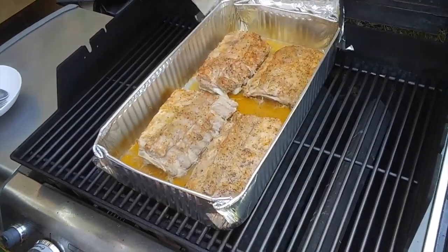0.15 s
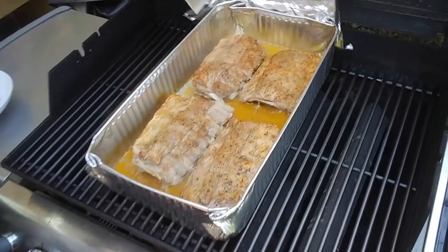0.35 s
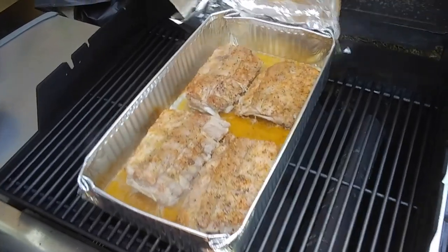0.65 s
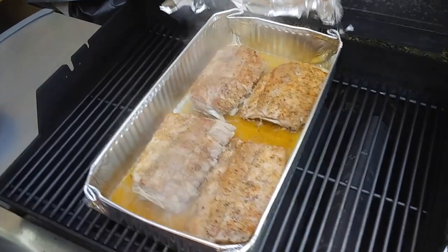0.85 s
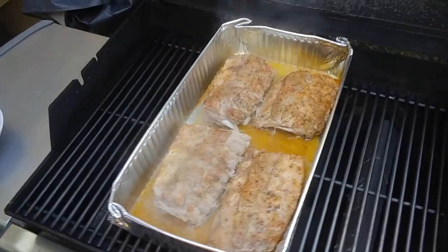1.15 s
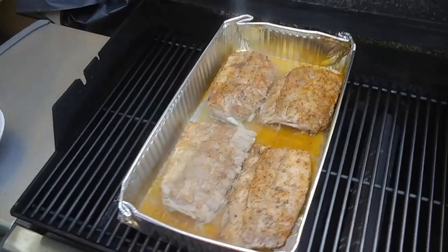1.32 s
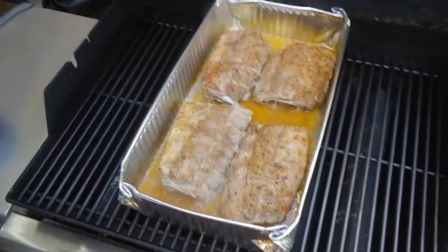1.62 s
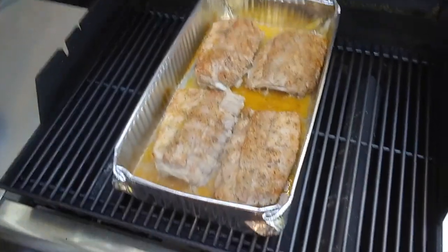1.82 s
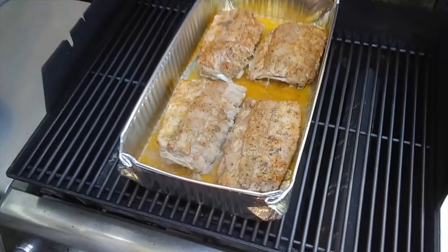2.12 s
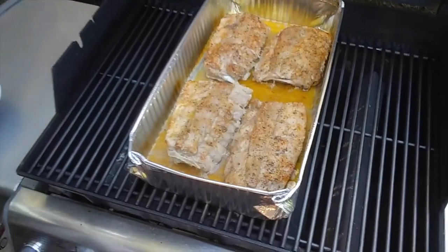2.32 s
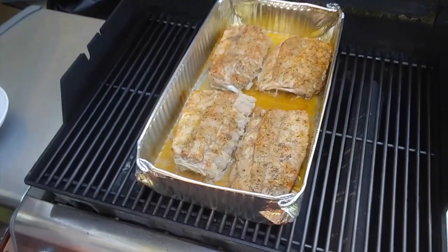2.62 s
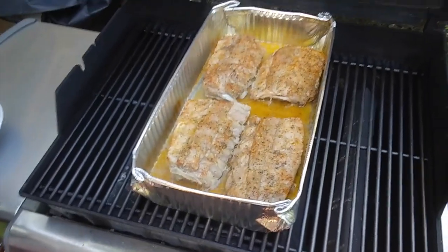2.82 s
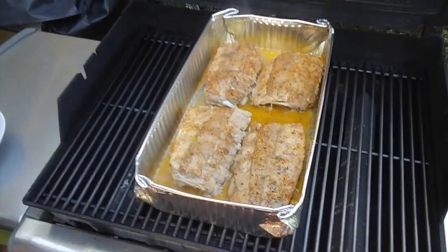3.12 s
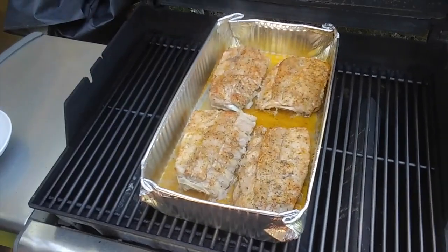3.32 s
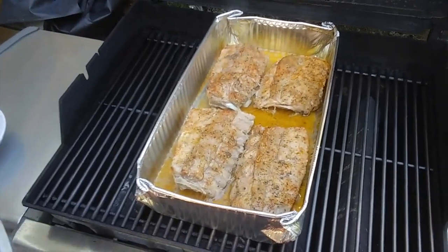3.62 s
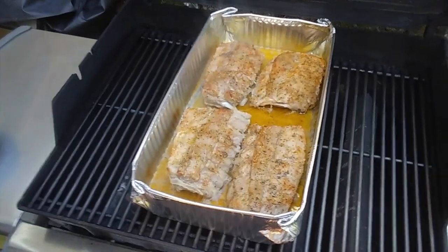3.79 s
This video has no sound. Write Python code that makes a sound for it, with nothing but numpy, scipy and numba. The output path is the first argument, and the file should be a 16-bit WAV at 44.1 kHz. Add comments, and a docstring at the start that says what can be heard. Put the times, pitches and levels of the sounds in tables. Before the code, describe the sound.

Close to the microphone, aluminium foil is pulled off a thin pan outdoors, crackling sharply with hollow metallic pops; after a second only faint rustles remain over thin hiss, small chirps and a distant low rumble.

```python
"""Foil crumpled outdoors

Close to the microphone a sheet of aluminium foil is pulled off a foil pan, crumpled and carried aside, where it
still crinkles. Dense random clicks, coloured and swelled in bursts, make the creases; damped modes make the popping
pan walls. Behind them lie a bright insect-like hiss of drifting noise bands, small birds as gliding sines,
and far rumble as filtered noise."""
import sys
import numpy as np
from scipy import signal
from scipy.fft import rfft, irfft
from scipy.io import wavfile
from scipy.ndimage import uniform_filter1d
from numba import njit

SR = 44100
rng = np.random.default_rng(int(sys.argv[2]) if len(sys.argv) > 2 else 0)


def voltage_ratio(decibels):
    """Convert decibels (scalar or array-like) to amplitude ratios, 20 dB per decade."""
    exponent = np.asarray(decibels, float) / 20
    return 10 ** exponent


def master(y):
    """Save y as 16-bit WAV."""
    cut = np.clip(np.atleast_2d(y).T, -1, 1)
    pcm = np.round(cut * 32767)  # scale
    wavfile.write(sys.argv[1], SR, pcm.astype(np.int16))


N = 174195
T = np.arange(N) / SR
F = np.fft.rfftfreq(N, 1 / SR) + 1e-3  # Hz, just above zero for the logarithm

# Spectrum of far traffic and air: pitch_hz, level_db (per Hz)
YARD_SPECTRUM = [(18, -34), (30, -2), (60, 0), (137, -1.5), (201, -9.5), (272, -3.5), (618, -18.5),
                 (834, -9), (999, -11.5), (1130, -22), (2550, -26.5), (3070, -33.5), (3600, -18),
                 (4680, -70)]
# Nearer bird notes: start_s, length_s, first_hz, last_hz, level_db
BIRD_NOTES = [(0.046, 0.049, 4350, 4300, -41), (1.207, 0.043, 2660, 2600, -55.5),
              (1.34, 0.043, 3000, 2960, -54.5), (1.428, 0.04, 2810, 2590, -53),
              (1.447, 0.16, 3330, 3350, -60.5), (1.613, .04, 4460, 4300, -40),
              (1.73, 0.057, 3600, 3200, -42), (1.737, 0.033, 3640, 4290, -42),
              (1.762, 0.059, 2964, 3170, -40), (1.776, 0.0396, 3210, 2610, -43),
              (2.14, 0.045, 2280, 2480, -55), (2.225, .03, 4600, 4250, -46), (2.26, .06, 4040, 4660, -47),
              (2.658, 0.075, 2350, 2350, -60), (2.917, 0.02, 2760, 2780, -55),
              (3.117, 0.037, 3190, 2960, -54), (3.198, 0.061, 2280, 2140, -58.5),
              (3.461, 0.053, 3020, 3010, -47), (3.586, 0.097, 2460, 2380, -53.5)]
# Course of the insect-like hiss: time_s, level_db, centre_hz
HISS_COURSE = [(0, -25.5, 6600), (.08, -34.5, 6340), (1.1, -39, 6200), (1.3, -43.5, 6370),
               (1.55, -44.5, 6300), (1.72, -40, 6370), (1.92, -47, 5830), (2.1, -41, 6200),
               (2.398, -40.5, 6120), (3.0, -37.5, 6140), (3.3, -36, 5960), (3.47, -35.5, 5700),
               (3.6, -32, 5700), (3.75, -32, 5820), (3.95, -36, 6250)]
# Smooth bands beside the hiss: centre_hz, width_hz, level_db (relative to the hiss)
HISS_SIDE_BANDS = [(4300, 1300, -12), (6700, 3200, -13), (9280, 1700, -20.5)]
# Pops of the pan walls: start_s, level_db, pitch_hz
PAN_POPS = [(0.181, -26.5, 913), (0.213, -25.5, 690), (0.269, -20, 786), (0.32, -21, 838),
            (0.404, -19.5, 904), (0.462, -22.5, 723), (0.549, -18.5, 837), (0.575, -23, 837),
            (0.666, -23.5, 707), (3.775, -37.5, 1170)]
# Duller rustles, the sheet dragged further away: start_s, hold_s, level_db
FAR_RUSTLES = [(1.32, 0.065, -49), (1.585, 0.06, -44), (1.685, 0.22, -47), (2.207, 0.072, -45.5),
               (2.882, .1, -58), (3.524, 0.097, -41), (3.703, 0.056, -53), (3.78, .05, -40)]
# Spectrum of those rustles: pitch_hz, level_db
RUSTLE_SPECTRUM = [(300, -45), (700, 5), (1200, 5), (1600, 2.5), (2800, 6.5), (4300, 3), (6000, 11),
                   (10000, -25), (15600, -50)]
# Crinkle bursts: start_s, swell_s, hold_s, level_db, dullness_db (what the mids gain on the treble)
CRINKLE_BURSTS = [(0, 0.00039, 0.017, -40.5, 5.5), (0.089, 0.052, 0.012, -31.5, 4),
                  (0.189, 0.016, 0.027, -25, -2.5), (0.243, 0.016, 0.069, -34, 4),
                  (0.322, 0.019, 0.028, -22, -6.5), (0.374, .005, 0.035, -31, 2),
                  (0.398, 0.02, 0.025, -19, -7.5), (0.456, 0.012, 0.018, -27, -4.5),
                  (0.489, 0.023, 0.035, -30.5, 3), (0.534, 0.029, 0.053, -21.5, -7.5),
                  (0.647, 0.029, 0.025, -33.5, 4.5), (0.703, 0.0083, 0.044, -34, 0),
                  (0.752, 0.034, 0.043, -26.5, -4), (0.848, 0.0073, 0.024, -25.5, -1),
                  (0.892, 0.02, 0.026, -37, 0.5), (0.95, .003, 0.011, -36, 2),
                  (1.316, 0.001, 0.012, -40, -0.5), (1.614, 0.009, 0.0083, -34.5, -3.5),
                  (2.203, .004, 0.019, -56, 13.5), (3.822, 0.005, .008, -39.5, 4),
                  (3.842, .002, 0.0065, -42, -3), (3.86, .002, 0.012, -42.5, 5.5),
                  (3.875, 0.014, 0.046, -35.5, -3.5)]
# Spectrum of the crease snaps: pitch_hz, level_db (per Hz)
FOIL_SPECTRUM = [(120, -58), (200, -13), (299, -13.5), (385, -5), (516, -18), (729, -6), (891, -7.5),
                 (1170, -16), (1430, -8), (1850, -9.5), (2350, -10), (2560, -5), (2850, -9), (6140, -6),
                 (6850, -2), (8380, -1), (9170, 1), (15600, -22.5)]
# Filter on the lingering shiver, the top dies first: pitch_hz, gain_db
SHIVER_FILTER = [(300, 1.5), (5000, 8.5), (10000, -2.5), (12000, -13), (15600, -7)]


def level(x, db):
    """Scale to an rms level."""
    return x * voltage_ratio(db) / np.sqrt(np.mean(x ** 2))


def colour(x, table):
    """Filter by (Hz, dB) points joined on a log-frequency axis."""
    hz, db = np.array(table).T
    gain_db = np.interp(np.log(F), np.log(hz), db)
    return irfft(rfft(x) * voltage_ratio(gain_db), N)


def walk(rate):
    """Random levels held 1 / rate s and slewed twice; spread near 1."""
    k = int(SR / rate)
    steps = np.repeat(rng.standard_normal(N // k + 1), k)
    return 1.3 * uniform_filter1d(uniform_filter1d(steps, k), k)[:N]


def grains(rate, spread_db, blur_db):
    """Random clicks of either sign, a few much larger, over the blur of countless small ones; rms 1."""
    size_db = spread_db * np.minimum(rng.exponential(size=N), 3)
    clicks = (rng.random(N) < rate / SR) * rng.choice([-1, 1], N) * voltage_ratio(size_db)
    return level(level(clicks, 0) + voltage_ratio(blur_db) * rng.standard_normal(N), 0)


def tail(x, t60, db):
    """The sound plus a decaying noise smear of it."""
    smear = rng.standard_normal(SR // 2) * voltage_ratio(-60 * T[:SR // 2] / t60)
    return x + voltage_ratio(db) * signal.fftconvolve(x, smear / np.sqrt(np.sum(smear ** 2)))[:N]


@njit
def svf(x, hz, width):
    """Band-pass (state-variable filter) with a moving centre, gain 1 at the centre."""
    y, band, low = np.empty(len(x)), 0., 0.
    for i in range(len(x)):
        g, k = np.tan(np.pi * hz[i] / SR), width / hz[i]
        v = (band + g * (x[i] - low)) / (1 + g * (g + k))
        band, low, y[i] = 2 * v - band, low + 2 * g * v, k * v
    return y


def ring(start, hz, t60, rise):
    """A damped mode after a soft push."""
    u = np.maximum(T - start, 0)
    return (1 - np.exp(-u / rise)) * voltage_ratio(-60 * u / t60) * np.sin(2 * np.pi * hz * u)


def modal(x):
    """Many close resonances at random places make the spectrum ragged; the mean power gain is 1."""
    width_hz, depth_db = 70, 2.5
    gain = voltage_ratio(depth_db * walk(SR * F[1] / width_hz)[:len(F)])  # the walk runs along frequency
    return irfft(rfft(x) * gain / np.sqrt(np.mean(gain ** 2)), N)


def swell(start, rise, hold, fall):
    """Rise, hold, exponential fall."""
    attack = np.clip((T - start) / max(rise, 1e-4), 0, 1)
    return attack * np.exp(-np.maximum(T - start - rise - hold, 0) / fall)


def patchy(x, low_hz, depth_db, rate, count=8):
    """Split into half-overlapping octave bands whose levels wander apart."""
    out = 0
    for hz in low_hz * 2. ** np.arange(count):
        band = colour(x, [(hz / 2, -40), (hz / 1.5, -3), (hz, 0), (hz * 1.33, -3), (hz * 2, -40)])
        out = out + band * voltage_ratio(depth_db * walk(rate))
    return out


def yard():
    """Far traffic and air: noise bands that each wander in level, the bass in short gusts."""
    level_db, gust_db = -49, 2.2
    bed = patchy(colour(rng.standard_normal(N), YARD_SPECTRUM), 28.5, 2.0, 5.97)
    bass = colour(bed, [(200, 0.5), (400, -7.5)])
    return level(bed + (voltage_ratio(gust_db * walk(16)) - 1) * bass, level_db)


def birds():
    """Short gliding whistles, hoarse and wavering, over fainter far ones; a garden echo."""
    far_count, far_db, far_spread_db = 60, -71, 4
    wobble_hz, roughness = 26, 0.3
    echo_db, echo_t60_s = -5, 0.35
    far = []
    for when, length, pitch, glide, loudness in rng.random((far_count, 5)):
        first_hz = 1300 + 2300 * pitch
        last_hz = first_hz * (1.03 - 0.094 * glide)
        far_level_db = far_db + far_spread_db * (2 * loudness - 1)
        far.append((T[-1] * when, 0.059 + 0.072 * length, first_hz, last_hz, far_level_db))
    wobble = 2 * np.pi * np.cumsum(wobble_hz * walk(250)) / SR
    out = 0
    for start_s, length_s, first_hz, last_hz, db in BIRD_NOTES + far:
        u = np.clip((T - start_s) / length_s, 0, 1)  # progress through the note
        envelope = np.sqrt(2 * np.sin(np.pi * u ** 0.7))
        cycles = length_s * (first_hz * u + (last_hz - first_hz) * u ** 2 / 2)
        out = out + voltage_ratio(db) * envelope * np.sin(2 * np.pi * cycles + wobble)
    return tail(out * (1 + roughness * walk(150)), echo_t60_s, echo_db)


def hiss():
    """A grainy band that drifts in pitch and swells, with weaker smooth bands beside it."""
    pass_width_hz, buzz_per_s, buzz_spread_db = 1910., 1500, 4.5
    sides_follow = 0.59  # share of the hiss swell, in dB, that the side bands take
    time_s, level_db, centre_hz = np.array(HISS_COURSE).T
    centre = np.interp(T, time_s, centre_hz) * (1 + 0.0045 * walk(7.15))
    db = np.interp(T, time_s, level_db)
    buzz = grains(buzz_per_s, buzz_spread_db, 4.9)
    band = svf(svf(buzz, centre, pass_width_hz), centre, pass_width_hz)
    out = level(band, 0) * voltage_ratio(db + 1.25 * walk(90))
    out = colour(out, [(4600, -7.5), (5400, -1.5)])
    for hz, width_hz, side_db in HISS_SIDE_BANDS:
        at = hz * (1 + 0.015 * walk(3.2))
        side = svf(svf(rng.standard_normal(N), at, 1. * width_hz), at, 1. * width_hz)
        course_db = db.mean() + sides_follow * (db - db.mean()) + 0.78 * walk(4.96)
        out = out + level(side, side_db) * voltage_ratio(course_db)
    return colour(out, [(2600, -19), (3800, 0)])


def pan():
    """The thin walls pop with a hollow note and a lower partner; once the pan bumps the grate."""
    pop_t60_s, pop_rise_s = 0.049, 0.00083
    under_ratio, under_db = 0.492, -8  # pitch and level of the lower partner
    thump_s, thump_db, thump_hz, thump_t60_s = 0.284, -24, 83.4, 0.06
    pops = 0
    for start_s, db, hz in PAN_POPS:
        note = ring(start_s, hz, pop_t60_s, pop_rise_s)
        under = ring(start_s, under_ratio * hz, pop_t60_s, pop_rise_s)
        pops = pops + voltage_ratio(db) * (note + voltage_ratio(under_db) * under)
    boom = ring(thump_s, thump_hz, thump_t60_s, 0.0017)
    knock = ring(thump_s, 214, 0.017, 0.0011)
    return pops + voltage_ratio(thump_db) * (boom + voltage_ratio(8.0) * knock)


def rustle():
    """Dull, smeared crumpling that starts quickly, holds and dies away."""
    rise_s, fall_s, patch_db = 0.016, 0.065, 3.2
    envelope = sum(voltage_ratio(db) * swell(start_s, rise_s, hold_s, fall_s) for start_s, hold_s, db in FAR_RUSTLES)
    crumple = modal(colour(grains(3000, 0.87, 1.2), RUSTLE_SPECTRUM))
    return envelope * level(patchy(crumple, 390, patch_db, 25.14, count=6), 0)


def foil():
    """Swarms of crease snaps in bursts; a duller shiver lingers behind them."""
    snaps_per_s, snap_spread_db, snap_blur_db = 6000, 4.5, -3.5
    fall_s, fall_per_length = 0.0073, 0.26  # long bursts die more slowly than ticks
    shiver_t60_s, shiver_db = 0.71, -4.5  # the sheet and yard ring on after each burst
    snaps = colour(grains(snaps_per_s, snap_spread_db, snap_blur_db), FOIL_SPECTRUM)
    blur = colour(rng.standard_normal(N), FOIL_SPECTRUM)
    treble = np.std(colour(blur, [(8700, -99), (8800, 0), (15000, 0)]))  # burst levels refer to this band
    high, mid = 0, 0
    for start_s, swell_s, hold_s, db, dullness_db in CRINKLE_BURSTS:
        shape = voltage_ratio(db) * swell(start_s, swell_s, hold_s, fall_s + fall_per_length * (swell_s + hold_s))
        high = high + shape
        mid = mid + shape * voltage_ratio(dullness_db)
    flutter = voltage_ratio(1.04 * walk(200))
    high, mid = flutter * high, flutter * mid
    keep = voltage_ratio(-120 / shiver_t60_s / SR)  # power kept from sample to sample
    linger = voltage_ratio(shiver_db) * np.sqrt(signal.lfilter([1 - keep], [1, -keep], mid ** 2))
    snaps = patchy(snaps, 136.8, 1.2, 44.76)
    mids = colour(snaps, [(3000, 0.5), (9000, -40)])
    shiver = linger * modal(colour(blur, SHIVER_FILTER))
    return (high * (snaps - mids) + mid * mids + shiver) / treble


def scene():
    """All sources reach one microphone, which adds its own faint noise."""
    mic_noise = voltage_ratio(-74) * rng.standard_normal(N)
    return (yard() + birds() + hiss() + pan() + rustle() + foil() + mic_noise)[None]


def band_limit(x):
    """A steep low-pass at the top of the band."""
    return signal.sosfilt(signal.butter(12, 15740, fs=SR, output="sos"), x)


def record(dry):
    """The microphone cuts the deep bass, has a narrow dip in the treble and rounds the peaks."""
    low_hz, soft_top = 53.3, 0.62
    notch_hz, notch_width_hz, notch_db = 8410, 410, -5
    notch = voltage_ratio(notch_db * np.exp(-((F - notch_hz) / notch_width_hz) ** 2))
    bass_cut = 1 / np.sqrt(1 + (low_hz / F) ** 8)
    heard = irfft(rfft(dry) * notch * bass_cut, N)
    mix = soft_top * np.tanh(heard / soft_top)
    return band_limit(mix)


dry = scene()
out = record(dry)
master(out)
```